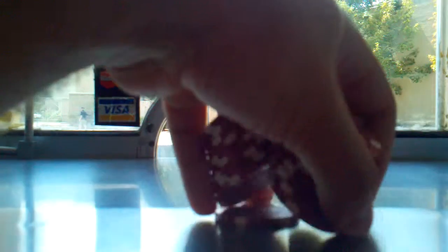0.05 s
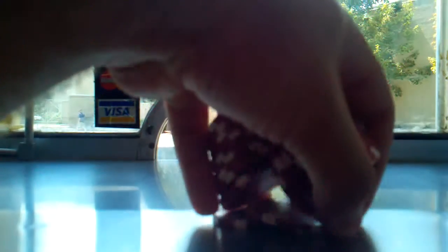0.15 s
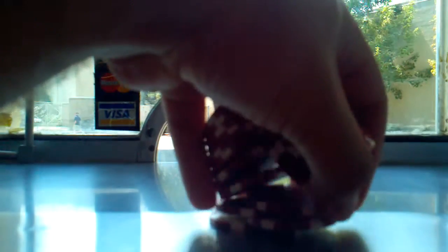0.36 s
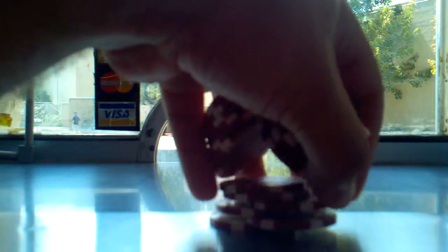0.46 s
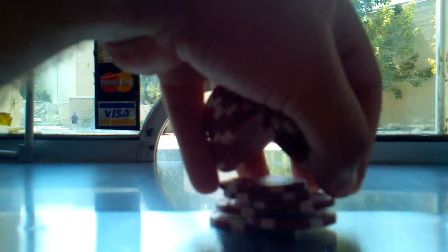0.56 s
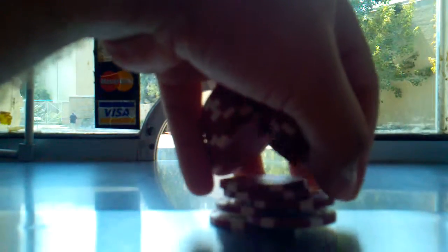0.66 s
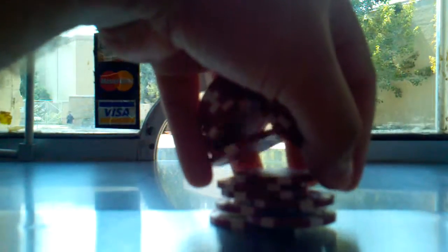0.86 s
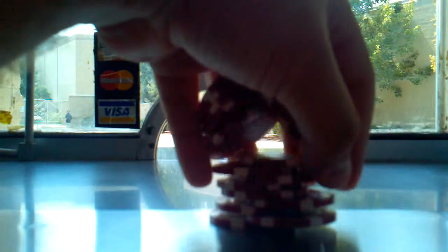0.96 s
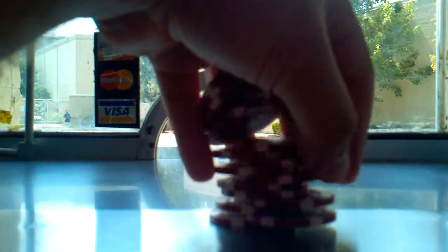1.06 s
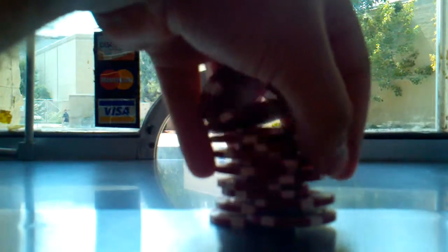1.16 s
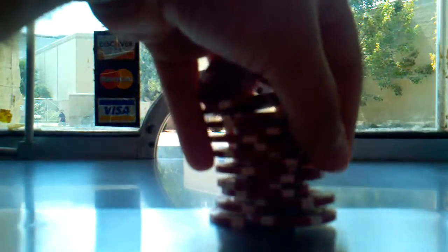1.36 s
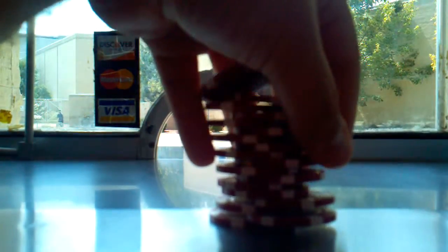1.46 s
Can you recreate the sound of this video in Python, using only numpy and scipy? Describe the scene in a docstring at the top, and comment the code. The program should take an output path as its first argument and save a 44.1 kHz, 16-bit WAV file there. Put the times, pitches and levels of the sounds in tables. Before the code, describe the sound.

A hand shuffles poker chips: one loud clack, sharp clicks, then a rapid rattling riffle

```python
"""On a counter in a humming room, a hand riffles two stacks of plastic chips close to two microphone ports.
Each contact is a rattle of tiny random impacts driving chip, stack and counter: it cracks, clacks, rings,
knocks and thuds, with a short room echo. Sliding, dragging and brushing are coloured noise under moving
levels; a finger judders as a gliding low sine. The second port hears it a little later and upside down."""
import sys
import numpy as np
from scipy import signal
from scipy.fft import rfft, irfft, next_fast_len
from scipy.io import wavfile
from scipy.ndimage import map_coordinates

SR = 44100
rng = np.random.default_rng(int(sys.argv[2]) if len(sys.argv) > 2 else 0)


def unload_wav(signal):
    """Save mono or channel-first audio to the path in sys.argv[1] as 16-bit WAV at rate SR, clipped to [-1, 1]."""
    wavfile.write(
        sys.argv[1],
        SR,
        np.round(np.clip(np.atleast_2d(signal).T, -1, 1) * 32767).astype(np.int16),
    )


N = 66150


def amp(db):
    """Convert dB to linear gain."""
    return 10 ** (np.asarray(db) / 20)


def unit(x):
    """Scale x to rms 1."""
    return x / np.sqrt(np.mean(x ** 2) + 1e-20)


def along(points, hz):
    """Interpolate (Hz, value) points on a log frequency axis."""
    point_hz, value = np.transpose(points)
    return np.interp(np.log(hz + 1), np.log(point_hz + 1), value)


def filtered(x, response):
    """Multiply the spectrum of x by a complex response of frequency, with padding."""
    size = next_fast_len(x.shape[-1] + 4096)
    spectrum = rfft(x, size) * response(np.fft.rfftfreq(size, 1 / SR))
    return irfft(spectrum, size)[..., :x.shape[-1]]


def wobble(rate_hz, size=N):
    """Smooth random curve: a spline through rate_hz random knots a second, at most 990."""
    knots = rng.standard_normal(int(size * 1000 / SR) + 4)
    return map_coordinates(knots, [np.arange(size) * min(rate_hz, 990) / SR])


def rush(tone, level, flutter_db, rate_hz):
    """Friction or air: two unrelated noises of one colour under one fluttering level."""
    s, db = np.transpose(level)
    noise = unit(filtered(rng.standard_normal((2, N)), lambda hz: amp(along(tone, hz))))
    level_db = np.interp(np.arange(N) / SR, s, db) + flutter_db * wobble(rate_hz)
    return noise * amp(level_db)


def ringing(modes, t):
    """Sum of damped sine modes, each with random level and pitch deviation."""
    vary_db, detune = 2, 0.01  # standard deviations; detune is a fraction of pitch
    total = 0
    for hz, db, t60_s in modes:
        level_dev, pitch_dev = rng.standard_normal(2)
        decay = amp(db + vary_db * level_dev - 60 * t / t60_s)
        total = total + decay * np.sin(2 * np.pi * hz * (1 + detune * pitch_dev) * t)
    return total


def snap(tone, t):
    """Single click: an impulse at sample 32 given this colour."""
    impulse = 1.0 * (np.arange(len(t)) == 32)
    return filtered(impulse, lambda hz: amp(along(tone, hz)))


# Chip contacts. Each row: start in seconds, rattle length in ms, main ring pitch in Hz, ring t60 in ms,
# then thud, knock, clack, ring and crack levels in dB, relative to one another.
CHIP_CONTACTS = [(0.004, 1.33, 7250, 36, -71, -61, -65, -85, -71),
                 (0.04, 1.3, 7300, 12, -50.5, -48.5, -92, -87, -79),
                 (0.069, 4.7, 7800, 12, -39.5, -58, -81, -80, -68),
                 (0.186, 3.7, 7600, 11, -52, -79, -58.5, -77, -71),
                 (0.193, 1.3, 7500, 31, -39, -50.5, -62, -68, -63),
                 (0.2196, 1.4, 7850, 12, -23.5, -14.5, -23, -22, -14.5),
                 (0.251, 6.9, 7600, 12, -46.5, -53, -42.5, -53, -47),
                 (0.27, 5.4, 7520, 12, -40, -38.5, -42, -45, -44),
                 (0.333, 1.1, 7500, 8.4, -50.5, -44.5, -59, -69, -57),
                 (0.343, 2.9, 7300, 12, -42, -42.5, -57.5, -62.5, -52),
                 (0.347, 2, 7020, 12, -48, -42, -54, -49.5, -60.5),
                 (0.412, 2.1, 6230, 10.8, -53.5, -49, -69, -56, -61),
                 (0.435, 0.82, 7740, 7.8, -41.5, -44, -63, -50.5, -68.5),
                 (0.44, 1.66, 7610, 14, -44, -28.5, -45, -36, -36),
                 (0.443, 5.5, 7360, 4.6, -38, -34.5, -39, -29.5, -33),
                 (0.4815, 1.75, 7550, 15, -35, -46.5, -51, -18, -21.5),
                 (0.489, 9, 6830, 4.5, -42, -40.5, -40, -42.5, -41.5),
                 (0.519, 4, 7110, 12, -55.5, -56, -60.5, -64, -67.5),
                 (0.54, 3.3, 7190, 20, -48.5, -55.5, -69.5, -66.5, -59),
                 (0.56, 9, 7140, 12, -53, -68, -74.5, -86, -69),
                 (0.66, 2, 7130, 13, -58, -70.5, -82.5, -96, -84),
                 (0.726, 3.1, 7280, 12, -64.5, -57, -67.5, -75, -63.5),
                 (0.772, 1, 7210, 15, -41, -29, -47.5, -20.5, -22),
                 (0.7733, 0.81, 7190, 11, -48.5, -26.5, -32.5, -15.5, -25),
                 (0.821, 3.64, 7370, 12, -45.5, -45, -46, -37.5, -46.5),
                 (0.9525, 4.8, 7170, 12, -41, -33.5, -46, -26.5, -31),
                 (0.96, 1.27, 6807, 22, -43, -43, -41, -20, -27),
                 (0.9619, 6.1, 7020, 8.5, -45, -43, -48.5, -34, -40),
                 (0.966, 3.9, 7400, 12, -44.5, -56.5, -48, -51, -36),
                 (0.984, 1.3, 7200, 12, -51, -49, -47, -63, -38.5),
                 (1.0139, 2.74, 6960, 28, -40.5, -36, -40, -21, -42),
                 (1.018, 2.95, 7470, 25, -40, -38.5, -34.5, -22.5, -23),
                 (1.05, 1.6, 7300, 11.3, -48, -60, -51, -61.5, -46),
                 (1.06, 5.9, 7790, 20, -56, -50, -44, -47.5, -42),
                 (1.069, 1.2, 7460, 6.8, -45, -52.5, -43.5, -28.5, -35),
                 (1.071, 3.4, 7100, 7.6, -45, -48, -40.5, -40, -32),
                 (1.1, 5.3, 7300, 12, -50, -50.5, -42.5, -43, -33),
                 (1.107, 1.65, 7410, 7.3, -45.5, -38, -60.5, -26.5, -24),
                 (1.109, 2.5, 6830, 21, -45, -41, -44.5, -32.5, -35),
                 (1.126, 3.3, 6900, 12, -65, -60, -69, -51, -43),
                 (1.15, 2.45, 7500, 11, -41.5, -43.5, -46.5, -59, -37.5),
                 (1.157, 3.6, 7490, 12, -53.5, -47, -44, -50, -42),
                 (1.175, 1.96, 7280, 14, -53.5, -66.5, -49.5, -49, -43.5),
                 (1.186, 3.63, 7550, 12, -53.5, -60.5, -56, -41.5, -64),
                 (1.192, 4, 7540, 12, -48.5, -51.5, -50.5, -41.5, -46.5),
                 (1.204, 5.5, 7200, 12, -48, -59, -42.5, -37, -39),
                 (1.212, 2.9, 7360, 8, -65, -58, -49, -52, -38),
                 (1.225, 5, 7400, 12, -45, -51.5, -37, -32, -52),
                 (1.23, 4.4, 7400, 24, -59.5, -44.5, -44.5, -35.5, -39),
                 (1.243, 3, 7700, 12, -56.5, -59.5, -64, -50.5, -48),
                 (1.257, 1.8, 7570, 10, -53.5, -53, -43.5, -46, -60),
                 (1.263, 3.6, 7180, 15, -58, -50.5, -50, -44.5, -65),
                 (1.282, 1.2, 7250, 12, -56, -50, -58, -72, -66),
                 (1.304, 6.1, 7750, 4, -55, -55, -40, -36, -68),
                 (1.336, 4.4, 7100, 11, -66, -54.5, -49, -65, -53.5),
                 (1.36, 2.9, 7500, 12, -79, -55.5, -60, -76, -62)]


def chips():
    """Each rattle drives the bodies by convolution; two versions of it give the ports their difference."""
    out, t = np.zeros((2, N + SR)), np.arange(SR // 5) / SR
    contact_gain_db, knock_fade_s = 3, 0.006  # the stack feels mostly the start of a rattle
    for start_s, ms, ring_hz, ring_t60_ms, thud_db, knock_db, clack_db, ring_db, crack_db in CHIP_CONTACTS:
        u = t[:1024]
        taps = rattle(u, ms / 1000)
        chip = chip_body(t, ring_hz, ring_t60_ms / 1000)
        stack = stack_body(t)
        patter = taps + settling(u)
        size = (ms + 2) * SR / 1000  # samples over which a level is the rms
        parts = [
            (thud_db, taps, counter_body(t), size + 300),
            (knock_db, taps * np.exp(-u / knock_fade_s), stack, size),
            (clack_db, patter, clack(t), size),
            (ring_db, taps, chip, size),
            (crack_db, patter, crack(t), size)]
        start = round(start_s * SR)
        for db, drive, body, rms_size in parts:
            sound = signal.fftconvolve(drive, body[None], axes=1)[:, :len(t)]
            sound = sound * np.sqrt(rms_size) / np.linalg.norm(sound, axis=1, keepdims=True)
            out[:, start:start + len(t)] += amp(db + contact_gain_db) * sound
    return out[:, :N]


def rattle(u, length_s):
    """Tiny impacts: two noises with a fast rise, a hold and a fade, spiky in blocks of 8 samples."""
    rise_s, fade_s, spiky_db = 0.00013, 0.0016, 4
    shape = np.clip(u / rise_s, 0, 1) * np.exp(-np.clip(u - length_s, 0, 1) / fade_s)
    noise = rng.standard_normal((2, len(u)))
    spikes = amp(spiky_db * rng.standard_normal(len(u) // 8).repeat(8))
    return shape * noise * spikes


def settling(u):
    """Chips settling: a decaying noise patter, tapered towards the end of its window."""
    settle_db, settle_s = -6.5, 0.0032
    taper = amp(settle_db - 60 * (u / u[-1]) ** 4)
    return taper * np.exp(-u / settle_s) * rng.standard_normal((2, len(u)))


# Other modes of a chip. Each row: pitch in Hz, level in dB, t60 in seconds.
CHIP_MODES = [(4490, -28.5, 0.051), (6120, -23, 0.019), (6240, -12.5, 0.019), (10584, -28.5, 0.051),
              (11560, -26.5, 0.019), (11300, -34, .02)]


def chip_body(t, ring_hz, ring_t60_s):
    """Chip: steady main ring plus its weak long part and other modes, which ring unevenly."""
    linger_db, linger_t60_s, waver_hz = -24, 0.044, 250
    ring = amp(-60 * t / ring_t60_s) * np.sin(2 * np.pi * ring_hz * t)
    for mode in [(ring_hz, linger_db, linger_t60_s)] + CHIP_MODES:
        ring = ring + ringing([mode], t) * wobble(waver_hz, size=len(t))
    return ring


# Click colour of a crack. Each row: frequency in Hz, level in dB.
CRACK_TONE = [(3000, -51), (5500, -22.5), (7000, -1.5), (8500, 2.5), (10000, 1), (12000, -0.5), (13500, -2),
              (15000, 2.5)]


def crack(t):
    """Crack: a click strongest in the treble."""
    return snap(CRACK_TONE, t)


# Click colour of a clack. Each row: frequency in Hz, level in dB.
CLACK_TONE = [(1500, -31), (2400, -31), (3200, 10.5), (3900, -10), (4600, 10), (5500, 17), (6500, -21.5),
              (9000, -46.5)]


def clack(t):
    """Clack: a click strongest in the upper middle."""
    return snap(CLACK_TONE, t)


# Modes of the stack. Each row: pitch in Hz, level in dB before differentiation, t60 in seconds.
STACK_MODES = [(560, -3, 0.004), (750, 7, 0.0069), (925, 3.5, .012), (1203, 7.5, 0.014),
               (1550, -5.5, 0.0086), (1823, -5, .01), (2180, -4.5, 0.019), (3143, -20.5, 0.02)]


def stack_body(t):
    """Stack: the slope of its damped modes, which favours the higher ones."""
    return np.gradient(ringing(STACK_MODES, t))


# Modes of the counter. Each row: pitch in Hz, level in dB, t60 in seconds.
COUNTER_MODES = [(178, -14.5, 0.18), (213, -1.5, 0.12), (267.5, 0.5, 0.13), (310, -3.5, 0.041),
                 (370, 5.5, 0.066), (417, 2, 0.053), (566.5, -31.5, .03)]


def counter_body(t):
    """Counter: damped low modes that take a moment to swell."""
    swell_s = 0.0007
    return ringing(COUNTER_MODES, t) * (1 - np.exp(-t / swell_s))


# Chips sliding on each other. Each row: time in seconds, level in dB before the chip modes.
SLIDE_LEVEL = [(0, -82), (.2, -76.5), (.24, -55), (.3, -102), (.4, -90.5), (.5, -53), (.58, -78.5),
               (.75, -87.5), (.77, -78), (.79, -50), (.845, -53.5), (.86, -62), (.94, -86.5), (.97, -52),
               (1.05, -52), (1.12, -50.5), (1.2, -43), (1.28, -50.5), (1.295, -64), (1.38, -79),
               (1.5, -84.5)]
# Colour of the scrape. Each row: frequency in Hz, level in dB.
SLIDE_COLOUR = [(1000, -19.5), (3000, -8), (4000, 1.5), (5500, -2.5), (7300, 1.5), (9000, -15),
                (11500, -19.5), (14000, -1)]


def sliding():
    """Gritty chip-on-chip noise, direct and through parallel chip resonances."""
    rub_hz, width_hz, rub_t60_s, resonance_db = 7400, 220, 0.0089, 7.5
    modes = [(rub_hz, 1)]  # main ring under rubbing
    # modes that last longer than the rubbed ring stand out more
    modes += [(hz, amp(db) * t60_s / rub_t60_s) for hz, db, t60_s in CHIP_MODES]

    def body(hz):
        damping = 1j * hz * width_hz
        resonances = sum(gain * damping / (mode_hz ** 2 - hz ** 2 + damping) for mode_hz, gain in modes)
        return 1 + amp(resonance_db) * resonances

    return filtered(rush(SLIDE_COLOUR, SLIDE_LEVEL, flutter_db=5, rate_hz=200), body)


# A finger juddering on the counter. Each row: time in seconds, pitch in Hz, level in dB.
JUDDER_PATH = [(0.061, 294.7, -93.5), (0.075, 310, -40), (0.088, 366, -51), (0.101, 370, -34),
               (.116, 399, -47.5), (0.125, 386, -37), (.14, 370, -51.5), (.16, 377, -45.5),
               (.18, 350, -84.5)]


def juddering():
    """Finger judder: one sine of gliding pitch and moving level, alike in both versions."""
    s, hz, db = np.transpose(JUDDER_PATH)
    t = np.arange(N) / SR
    phase = 2 * np.pi * np.cumsum(np.interp(t, s, hz)) / SR
    return amp(np.interp(t, s, db) + 0.6 * wobble(40)) * np.sin(phase)


# The hand dragging on the counter. Each row: time in seconds, level in dB.
DRAG_LEVEL = [(0, -44.5), (.05, -51.5), (.1, -51.5), (.18, -50.5), (.2, -45), (.3, -49), (.4, -48),
              (.45, -42.5), (.53, -49), (.6, -67), (.765, -70.5), (.79, -43.5), (.86, -49), (.9, -71),
              (.945, -75), (.965, -40.5), (1.1, -48.5), (1.2, -51), (1.3, -59), (1.4, -78), (1.5, -66)]
# Colour of the drag. Each row: frequency in Hz, level in dB.
DRAG_COLOUR = [(60, -20), (150, -7), (300, 8.5), (420, -9), (700, -3.5), (1200, -13), (2000, -23.5),
               (5000, -36)]


def dragging():
    """Hand on counter: low noise, fluttering in level."""
    return rush(DRAG_COLOUR, DRAG_LEVEL, flutter_db=4, rate_hz=40)


# Fingers brushing the chip rims. Each row: time in seconds, level in dB.
BRUSH_LEVEL = [(0, -74), (.04, -60.5), (.1, -60.5), (.15, -74), (.2, -77.5), (.3, -91.5), (1.5, -97)]
# Colour of the brush. Each row: frequency in Hz, level in dB.
BRUSH_COLOUR = [(3000, -9.5), (5000, -9), (6800, 2), (8700, 5), (9800, -2.5), (11300, 2.5), (12500, -2.5),
                (14000, -3)]


def brushing():
    """Fingers on rims: treble noise, fluttering in level."""
    return rush(BRUSH_COLOUR, BRUSH_LEVEL, flutter_db=-2.1, rate_hz=90)


# Decay of the room echo. Each row: frequency in Hz, t60 in seconds.
ECHO_T60 = [(200, 0.1), (1500, 0.2), (5000, 0.11), (12000, 0.1)]


def echo(x):
    """Room answer: convolution with a noise tail whose frequencies die at their own speeds."""
    level_db, delay_samples = -15.5, 150
    hz, t, z = signal.stft(rng.standard_normal((2, SR // 2)), SR, nperseg=256)
    decay = amp(-60 * t / along(ECHO_T60, hz)[:, None])
    tail = signal.istft(z * decay, SR, nperseg=256)[1]
    tail = tail / np.linalg.norm(tail[0])
    delayed = np.pad(x, ((0, 0), (delay_samples, 0)))
    return amp(level_db) * signal.fftconvolve(delayed, tail, axes=1)[:, :N]


# Faint machine tones. Each row: pitch in Hz, level in dB.
HUM_TONES = [(1100, -75), (1300, -77.5)]


def hum():
    """Machine hum: sines of fixed pitch with slowly wavering level."""
    t = np.arange(N) / SR
    return sum(amp(db + 1.6 * wobble(4)) * np.sin(2 * np.pi * hz * t) for hz, db in HUM_TONES)


# Colour of the room air. Each row: frequency in Hz, level in dB.
ROOM_COLOUR = [(40, -13), (130, 15.5), (350, 5), (800, -11.5), (1200, -6), (2000, -17.5), (3000, -16),
               (5000, -23.5), (8000, -19.5), (14000, -19.5)]


def air():
    """Room air: coloured noise around a constant level, with slow flutter."""
    level_db = -57.5
    return rush(ROOM_COLOUR, [(0, level_db), (1.5, level_db)], flutter_db=3, rate_hz=3)


# Likeness of the two ports. Each row: frequency in Hz, likeness from 0 to 1.
PORT_LIKENESS = [(60, 0.9), (150, 0.38), (300, 1), (450, 0.89), (800, .85), (1200, 1), (1720, 0.9),
                 (2600, 1), (4000, 0.84), (5200, .97), (7800, .97), (9600, 0.27), (12000, .92)]
# Balance of the ports. Each row: frequency in Hz, right over left in dB.
PORT_BALANCE = [(40, 13), (150, -3.5), (400, -2.5), (1200, 1.5), (6000, -1.5), (13000, 1)]


def ports(a, b):
    """Left port hears a; the late, inverted right port hears a mix of a and b set by likeness."""
    lag_s = 17.1 / 44100

    def alike(hz):
        return np.clip(along(PORT_LIKENESS, hz), 0, 1)

    def late(hz):
        return -amp(along(PORT_BALANCE, hz)) * np.exp(-2j * np.pi * hz * lag_s)

    shared = filtered(a, lambda hz: alike(hz) * late(hz))
    unshared = filtered(b, lambda hz: np.sqrt(1 - alike(hz) ** 2) * late(hz))
    return np.array([a, shared + unshared])


def scene():
    """Sum two versions of all sources and pass them to the ports; only the contacts echo."""
    hits = chips()
    echoes = echo(hits)
    room = hum() + air()
    slides = sliding()
    hand = juddering() + dragging() + brushing()
    a, b = hits + echoes + room + slides + hand
    return ports(a, b)


def record(dry):
    """Microphone chain: bass cut, overload, standing offset, uneven overload, treble slope, band limit."""
    bass_hz, clip_level, offset_db, lopsided = 121, 0.95, -62, 0.21
    edge_hz, edge_db_per_khz, top_hz = 13700, 55, 15057

    def bass_cut(hz):
        return (hz * hz / (hz * hz - bass_hz ** 2 - 1.3j * hz * bass_hz)) ** 2

    def treble_cut(hz):
        slope_db = -edge_db_per_khz * np.clip(hz - edge_hz, 0, None) / 1000
        return amp(slope_db) * (hz < top_hz)

    x = filtered(dry, bass_cut)
    x = x / (1 + np.abs(x / clip_level) ** 6) ** (1 / 6)
    x = x + amp(offset_db) * np.array([[1], [-1]])  # opposite sign in each port
    x = x + lopsided * x ** 4  # always pushes upwards: loud hits thump
    return filtered(x, treble_cut)


dry = scene()
out = record(dry)
unload_wav(out)
```